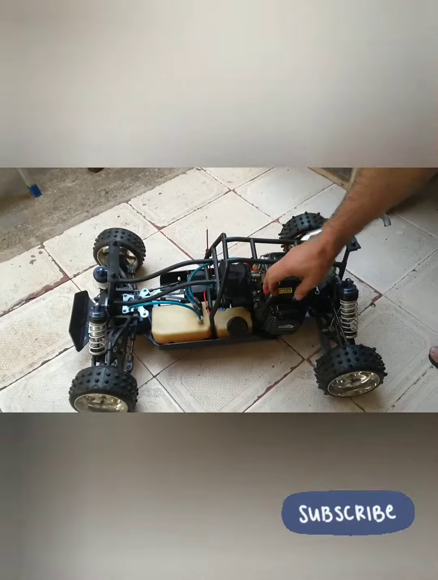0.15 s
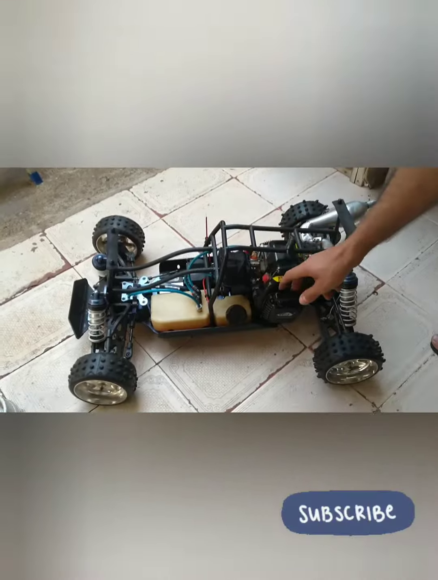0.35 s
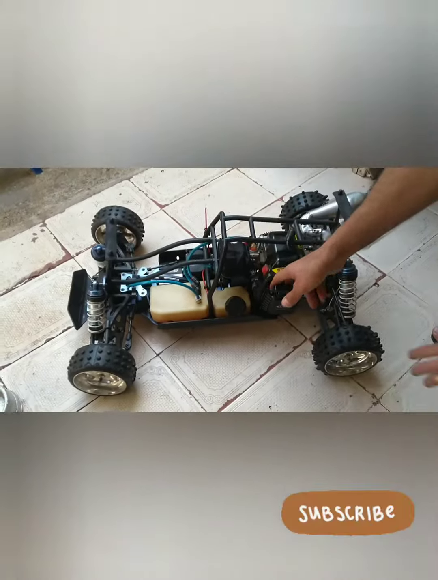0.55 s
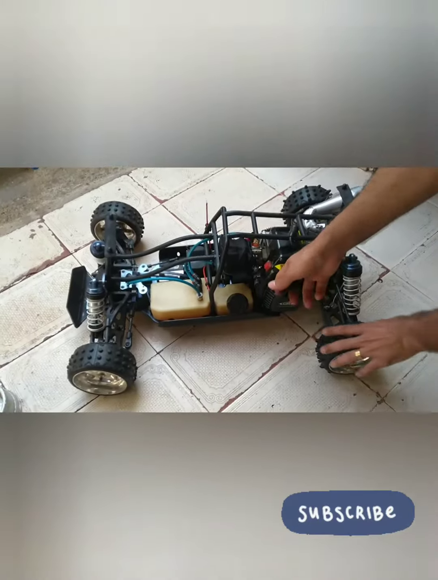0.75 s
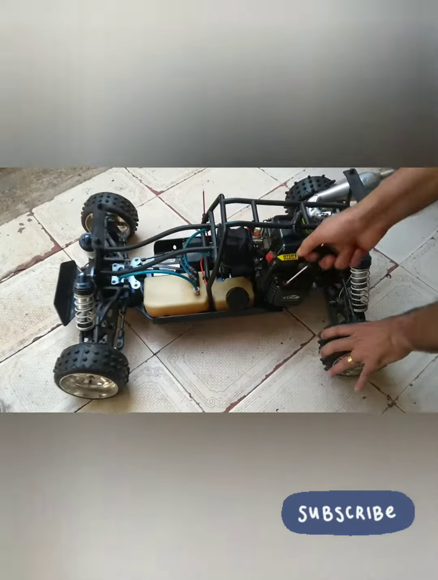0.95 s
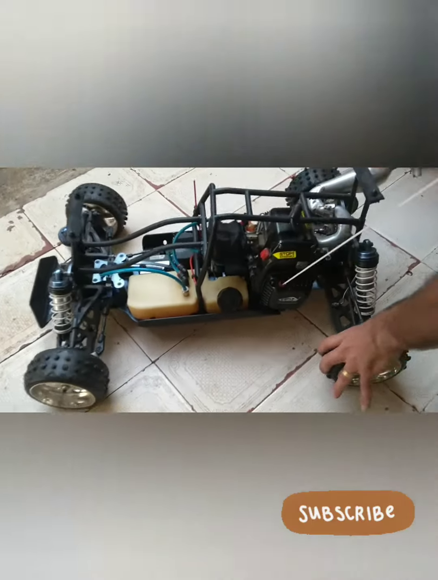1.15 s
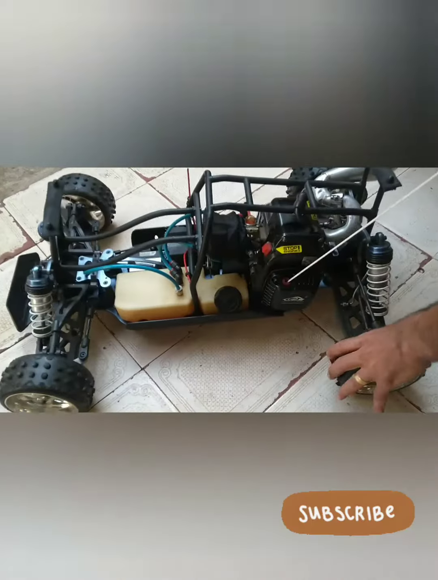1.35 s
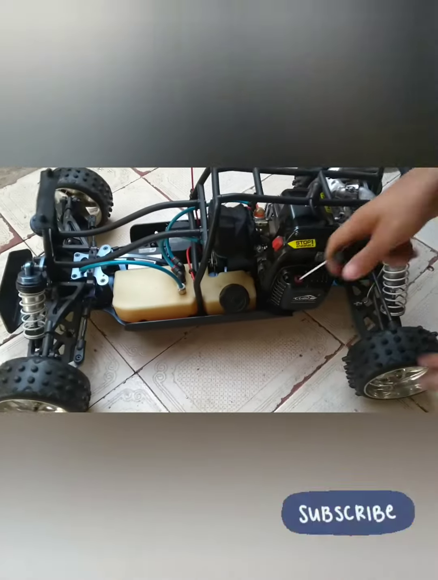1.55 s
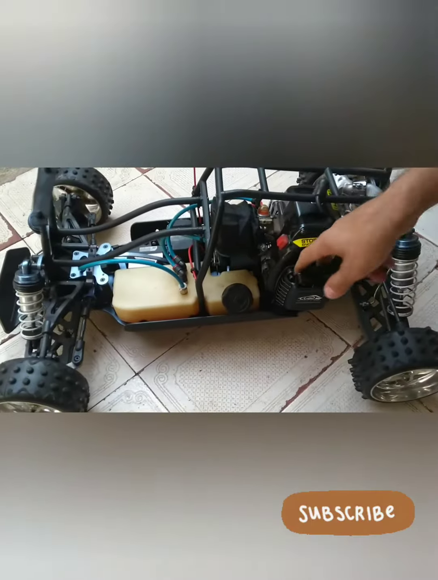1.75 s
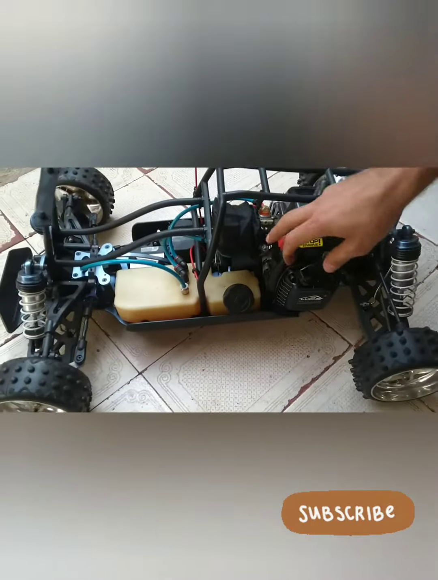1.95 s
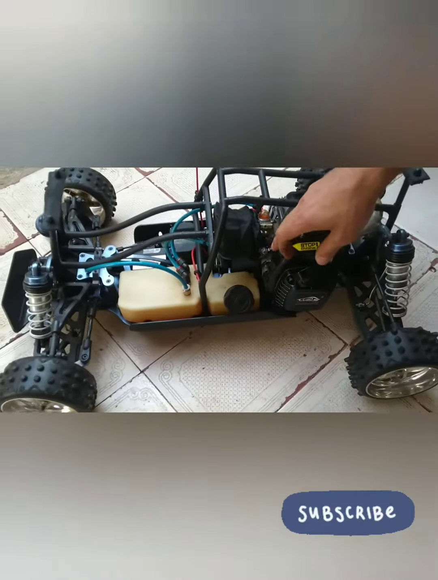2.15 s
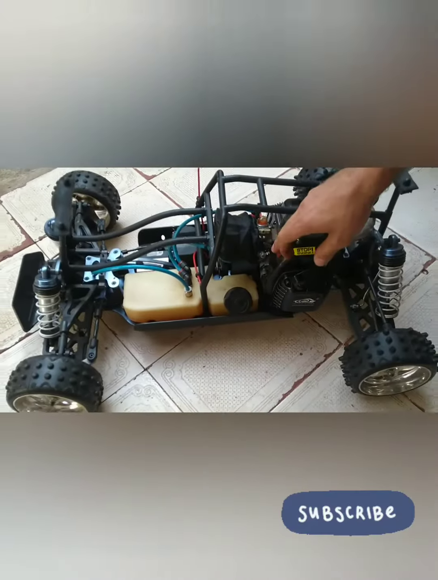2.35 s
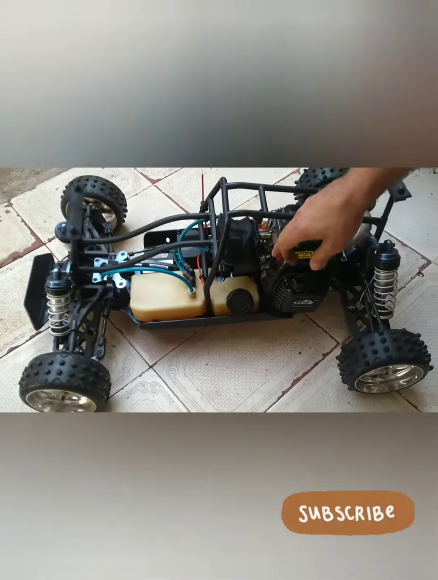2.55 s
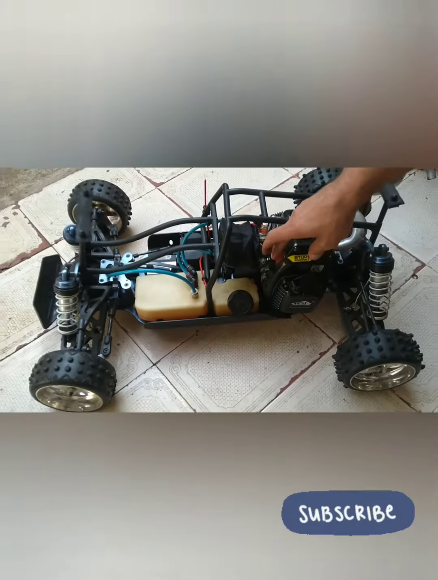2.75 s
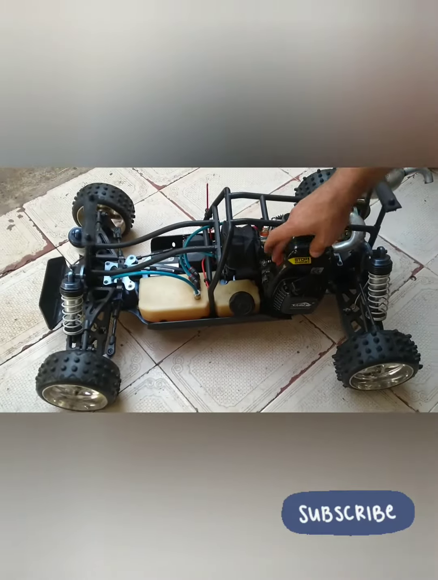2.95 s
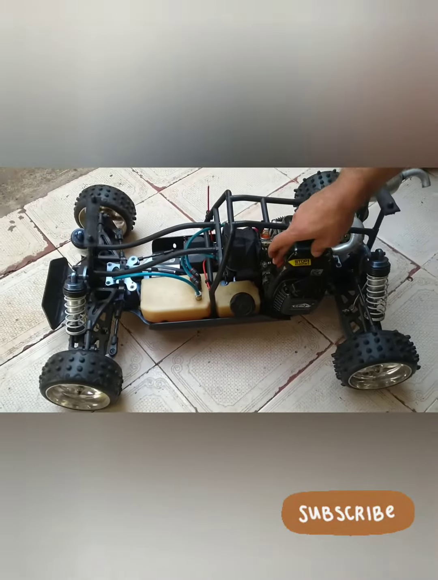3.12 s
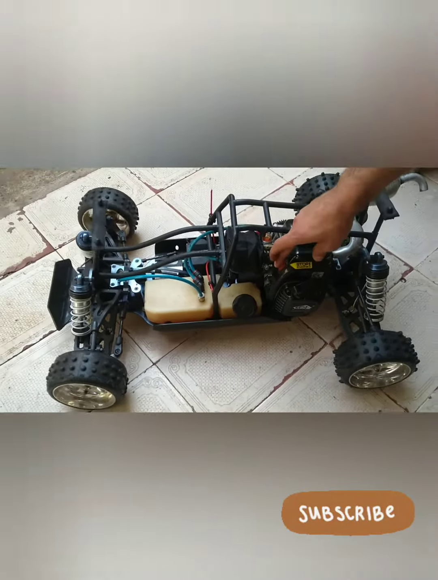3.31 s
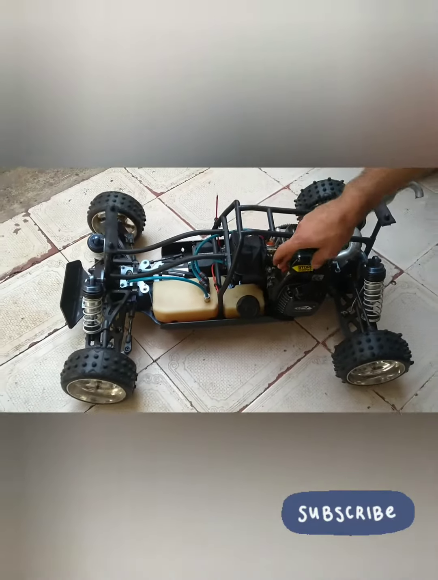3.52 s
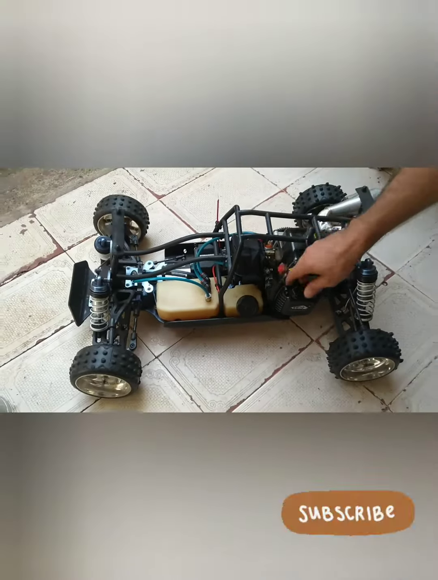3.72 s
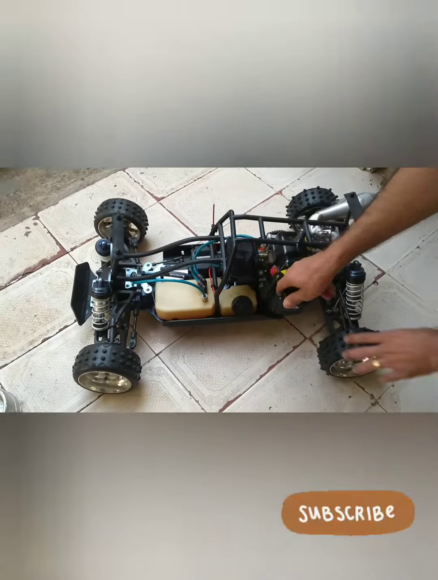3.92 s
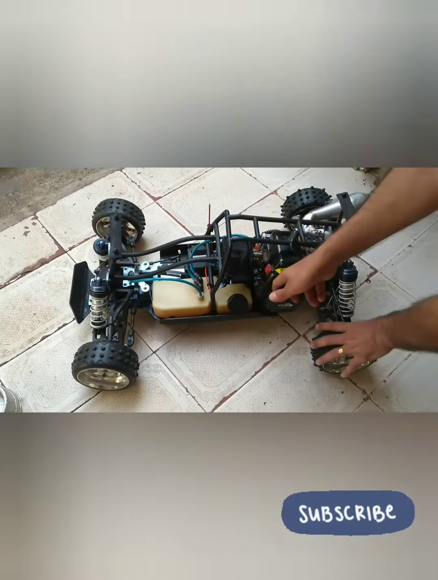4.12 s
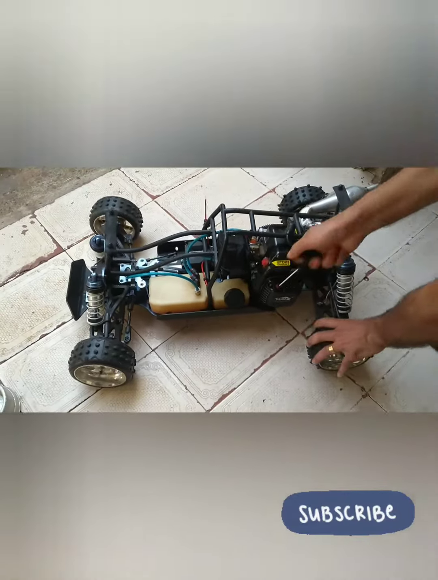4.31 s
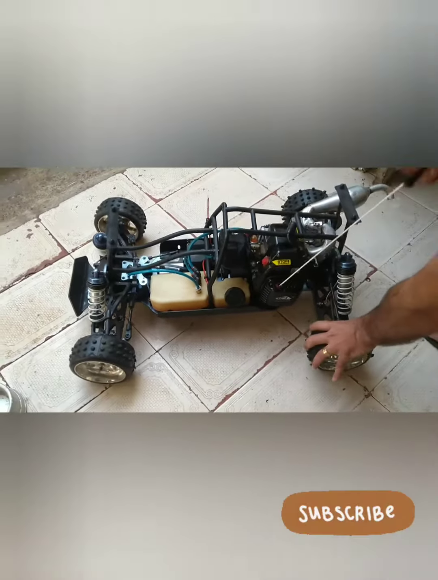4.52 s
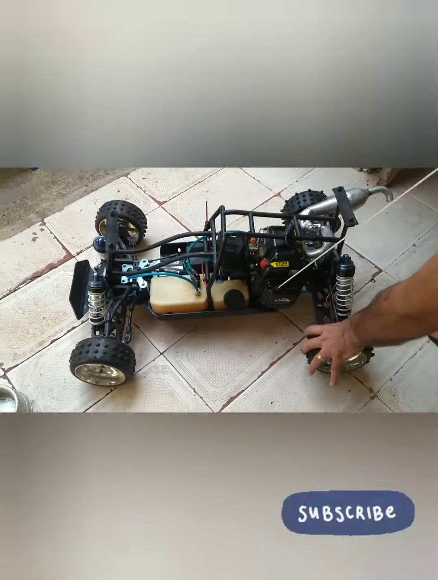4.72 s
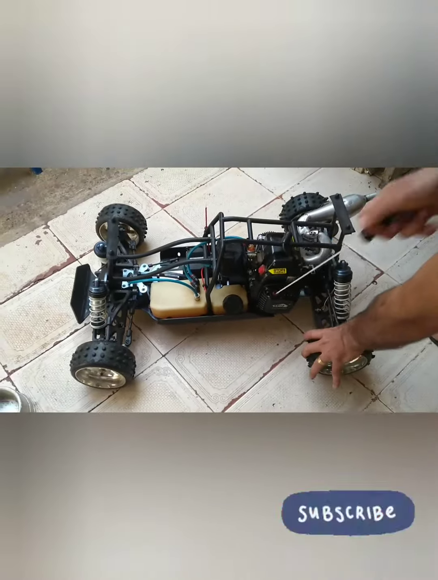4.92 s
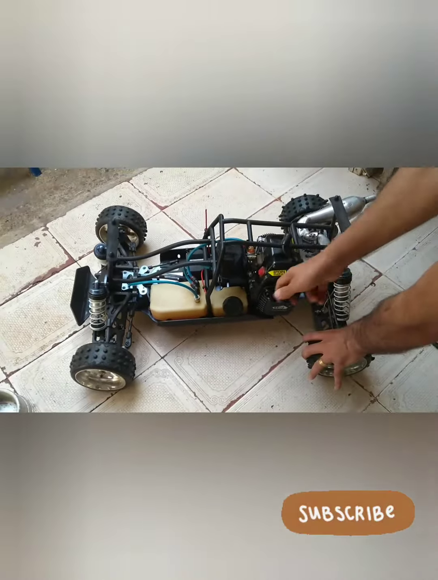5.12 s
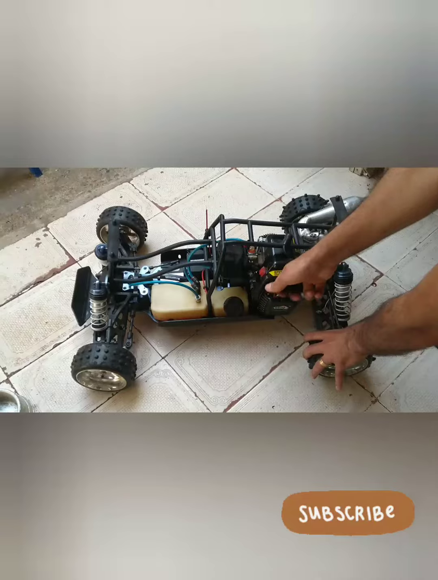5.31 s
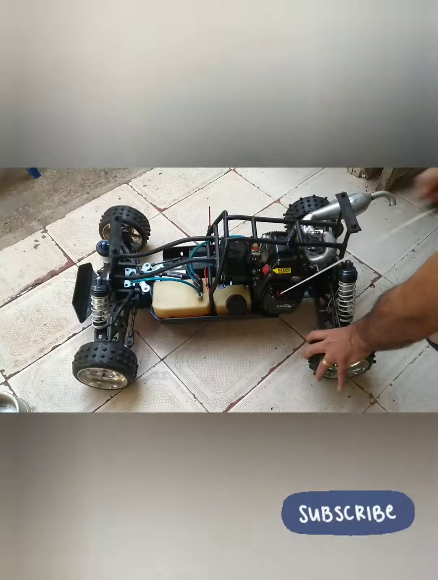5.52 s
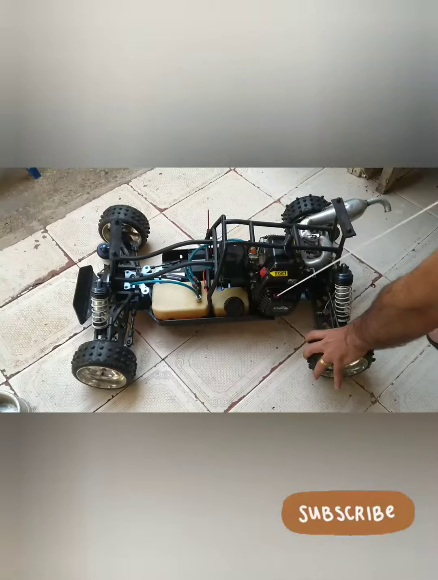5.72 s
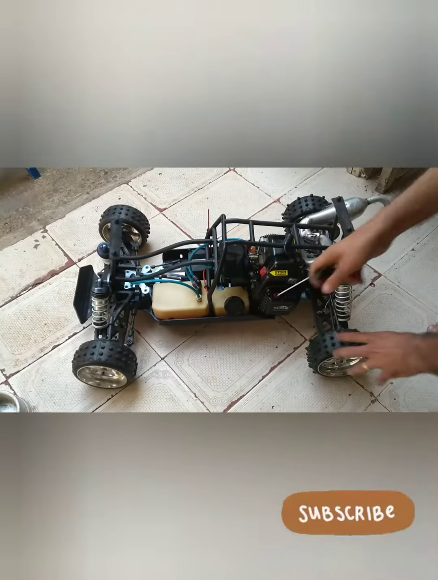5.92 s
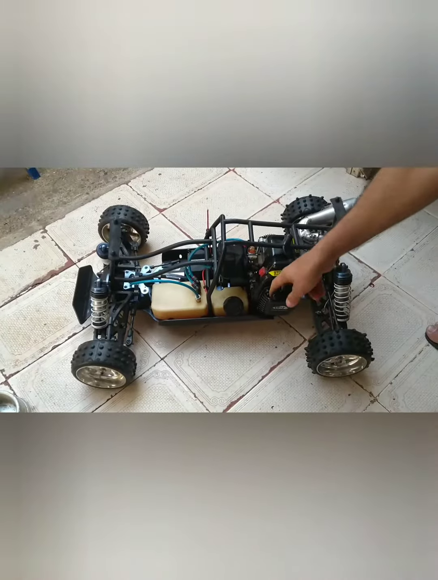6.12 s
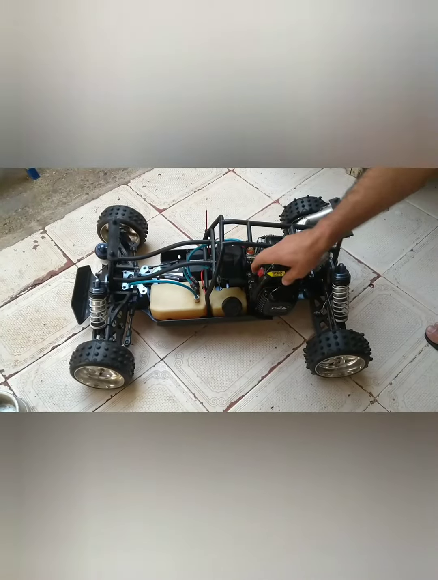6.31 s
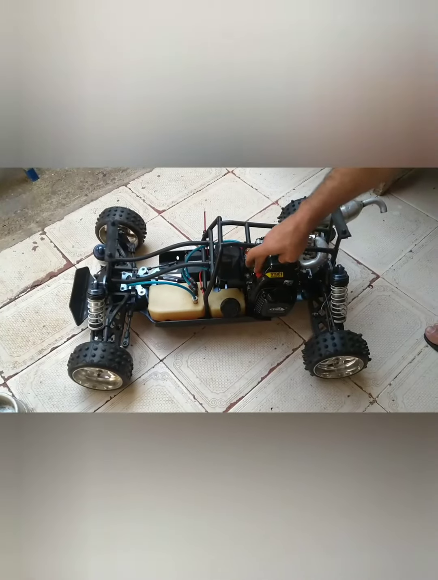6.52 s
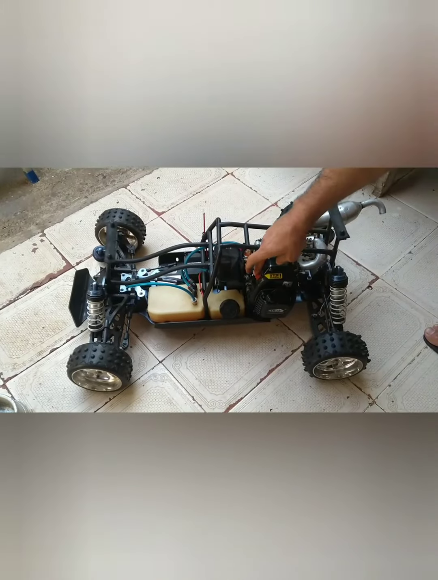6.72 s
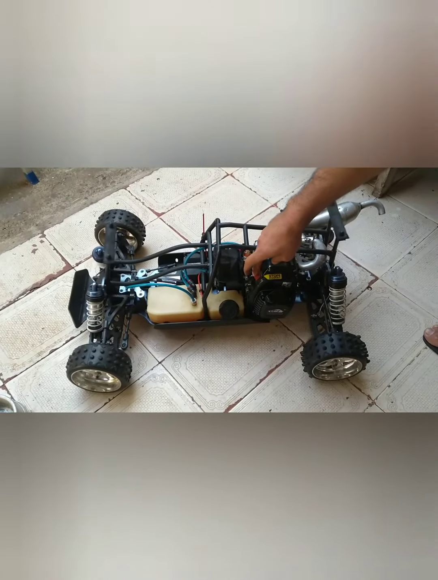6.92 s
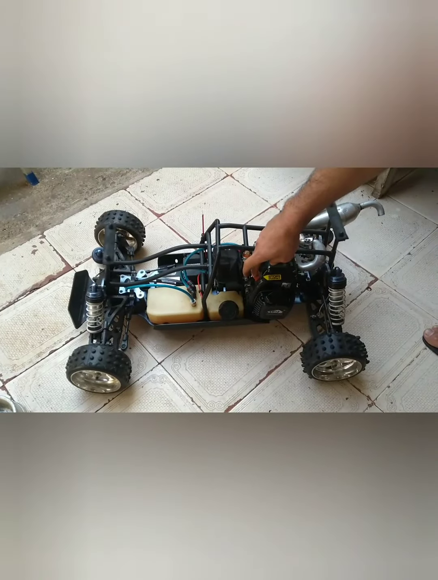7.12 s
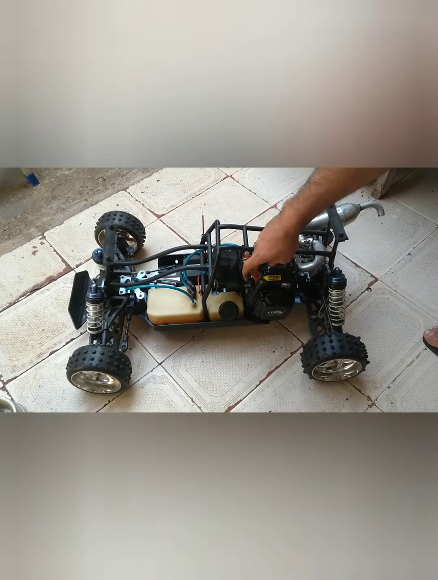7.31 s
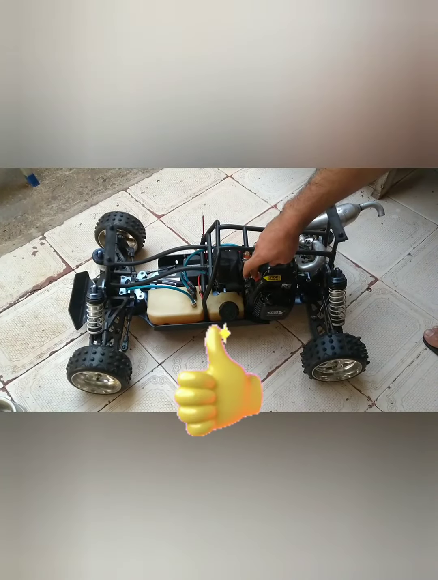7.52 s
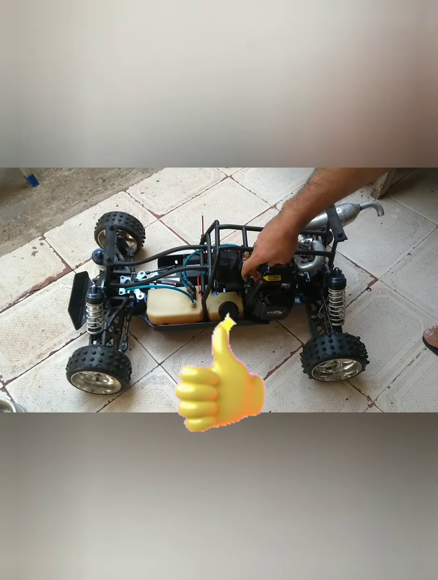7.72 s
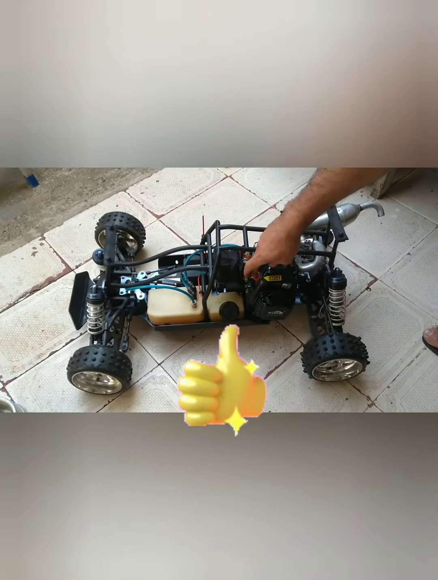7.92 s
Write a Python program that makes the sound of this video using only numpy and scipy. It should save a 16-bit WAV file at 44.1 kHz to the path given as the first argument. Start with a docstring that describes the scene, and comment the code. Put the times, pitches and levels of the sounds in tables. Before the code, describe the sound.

Close stereo pickup in a tiled yard with short hard echoes. Faint handling and small clicks, then a cord pull with low thumps sets off a small two-stroke engine, rasping and popping irregularly for about two seconds before it dies with a clack. A near-silent pause follows, then knocks, a scraping cord, thin reel squeaks, and a second pull starts the engine, which sputters on to the end.

```python
"""A small two-stroke engine in a tiled yard is pulled by its cord, sputters and dies.
After a pause with faint handling, the cord is pulled again with clicks and squeaks, and the engine runs.
Firings are blasts of noise through a resonant pipe; turns, thumps and knocks excite modes of the body and frame.
Echoes, low hum and faint air surround it; two ports, each less the delayed other, give left and right.
"""
import sys
import numpy as np
from scipy import signal
from scipy.fft import rfft, irfft, next_fast_len
from scipy.io import wavfile

SR = 44100
rng = np.random.default_rng(int(sys.argv[2]) if len(sys.argv) > 2 else 0)


def put_to_file(sound):
    """Save the sound as 16-bit audio at rate SR, in the file named by the first command-line argument."""
    columns = np.atleast_2d(sound).T  # one column per channel
    safe = np.clip(columns, -1, 1)
    whole_steps = np.round(safe * 32767)
    wavfile.write(sys.argv[1], SR, whole_steps.astype(np.int16))


N = 350593
T = np.arange(N) / SR
SIZE = next_fast_len(N + SR)
HZ = np.maximum(np.fft.rfftfreq(SIZE, 1 / SR), 1)


def amp(db):
    """Level law: decibels to amplitude ratio."""
    return 10 ** (np.asarray(db) / 20)


def unit(x):
    """Normalisation: scaled to rms 1."""
    return x / np.sqrt(np.mean(x ** 2) + 1e-20)


def at_hz(points):
    """Logarithmic pitch scale: a spectrum table interpolated at every frequency."""
    return np.interp(np.log(HZ), np.log(np.array(points)[:, 0]), np.array(points)[:, 1])


def shaped(x, response):
    """Linear filtering: the spectrum is multiplied by a frequency response."""
    return irfft(rfft(x, SIZE) * response, SIZE)[..., :N]


def high_pass(corner_hz, order):
    """Bass loss: cascaded first-order high-pass response."""
    return 1 / (1 + corner_hz / (1j * HZ)) ** order


# correlation of the two ports: pitch_hz, likeness (0 to 1)
PORT_LIKENESS = [(30, .9995), (120, .995), (300, .99), (600, .95), (1000, .3), (1500, 0.), (14000, 0.)]


def at_ports(colour):
    """Spatial coherence: coloured noise, alike at both ports in the bass, unrelated in the treble; rms 1."""
    alike = at_hz(PORT_LIKENESS)
    mid, side = rng.standard_normal((2, len(HZ))) + 1j * rng.standard_normal((2, len(HZ)))
    opposed = side * np.sqrt(1 - alike) * [[1], [-1]]
    return unit(irfft(colour * (mid * np.sqrt(1 + alike) + opposed), SIZE)[:, :N])


def narrow(hz, width_hz):
    """Resonance: noise in one narrow band, at half amplitude width_hz from its centre."""
    return at_ports(1 / (1 + ((HZ - hz) / width_hz) ** 2))


def dying(times, gains, t60s, attack_s, shut_db=0, shut_s=1):
    """Exponential decay: events rise fast and die away, with a further drop around shut_s."""
    out = np.zeros(N)
    for s, gain, t60 in zip(times, gains, t60s):
        i = int(s * SR)
        t = T[:min(N - i, SR // 2)]
        drop_db = shut_db / (1 + (shut_s / (t + 1 / SR)) ** 6)
        out[i:i + len(t)] += gain * (1 - np.exp(-t / attack_s)) * amp(-60 * t / max(t60, .005) + drop_db)
    return out


def in_time(tables):
    """Envelope: level columns interpolated in time as gains, silent outside the tables."""
    out = 0
    for rows in tables:
        s, *levels = np.transpose(rows)
        out = out + amp([np.interp(T, s, level, left=-150, right=-150) for level in levels])
    return out


def spells(rows, edge_db_per_s):
    """Envelope: each sound sets in, holds and fades at the given rate, setting in 3.7 times faster."""
    out = 0
    for s, length, db in rows:
        outside_s = np.maximum(np.maximum(3.7 * (s - T), T - s - length), 0)
        out = out + amp(db - edge_db_per_s * outside_s)
    return out


def crackle(per_s, lasting_s, depth):
    """Shot noise: random bursts that decay exponentially make an uneven gain of rms 1."""
    bursts = (rng.random(N) < per_s / SR) * np.minimum(rng.exponential(1, N), 2)
    decay = np.exp(-1 / (lasting_s * SR))
    # the tiny offset avoids denormal numbers
    return unit(1 + depth * unit(signal.lfilter([1], [1, -decay], bursts + 1e-18)))


def modal(modes):
    """Modal superposition: a sum of damped resonances, with alternating signs and a cut in the deep bass."""
    response = 0
    for k, (hz, db, t60) in enumerate(modes):
        damping = np.log(1000) / t60
        response = response + (-1) ** k * amp(db) / (damping + 1j * np.pi * (HZ ** 2 - hz ** 2) / HZ)
    return response * high_pass(100, 2)


def scattered(events, modes, spread_db):
    """Random excitation: a random strength per blow and mode, a random phase at each port."""
    draws = rng.standard_normal((len(events), 3, len(modes)))
    return amp(spread_db * draws[:, :1]) * np.exp(1j * draws[:, 1:])


def struck(modes, times, gains, damped_s=None, attack_s=1e-4):
    """Free vibration: blows ring the modes; gains has strength and phase per blow, port and mode."""
    hz, level_db, t60 = np.transpose(modes)[:, :, None]
    t = T[:SR // 3]
    rings = amp(level_db - 60 * t / t60) * np.exp(2j * np.pi * hz * t) * (1 - np.exp(-t / attack_s))
    out = np.zeros((2, N + len(t)))
    for k, (s, gain) in enumerate(zip(times, gains)):
        damping = 1 if damped_s is None else amp(-60 * t / damped_s[k])
        start = int(s * SR)
        out[:, start:start + len(t)] += np.imag(gain @ rings) * damping
    return out[:, :N]


# spectrum of the background air noise: pitch_hz, level_db (relative)
AIR_SPECTRUM = [(25, -22), (50, -1), (100, 6), (300, -3), (1000, -4), (2000, -7.5), (2240, -13.5),
                (2500, -7), (5000, -8.5), (10000, -9.5), (14500, -14)]


def air():
    """Stationary random noise: a faint coloured bed under everything."""
    return amp(-63.5) * at_ports(amp(at_hz(AIR_SPECTRUM)))


def yard(x):
    """Reverberation: dense echoes from tiles and walls decay exponentially, with bass and treble lost."""
    t60_s, level_db, treble_cut_hz, bass_cut_hz = 0.4, -3.5, 11000, 292
    t = T[:SR]
    echoes = at_ports(1)[:, :SR] * amp(-60 * t / t60_s) * (t > .006)
    echoes = echoes / np.sqrt(np.sum(echoes ** 2) / 2)
    colour = high_pass(bass_cut_hz, 1) / (1 + 1j * HZ / treble_cut_hz)
    return amp(level_db) * shaped(x.mean(axis=0), rfft(echoes, SIZE) * colour)


# low background rumble and hum, and held notes of pipe or body:
# start_s, length_s, level_db, pitch_hz, fade_db_per_s
HUM_AND_NOTE_SPELLS = [(0, 0.23, -67, 52, 100), (.4, 0.31, -66, 52, 100), (3.375, 0.13, -72.5, 52, 100),
                       (0.0, 0.052, -63.5, 161, 45), (1.2, 0.14, -41, 421, 200),
                       (1.512, 0.63, -49.5, 401.1, 197), (2.2, 0.85, -45, 421, 206),
                       (2.898, 0.16, -37, 228, 93), (2.958, 0.24, -44.5, 161.4, 77),
                       (3.028, 0.055, -45, 386, 103), (5.565, 0.36, -44, 432, 200),
                       (7.802, 0.18, -48, 420.6, 200)]


def hum_and_notes():
    """Resonance: narrow bands of noise, as background rumble and hum or notes of pipe or body, hold and fade."""
    out = 0
    for s, length, db, hz, fade in HUM_AND_NOTE_SPELLS:
        out = out + spells([(s, length, db)], fade) * narrow(hz, 13)
    return out


# hands and cord on the machine, one table before each run: time_s, rub_db, rustle_db (both relative)
HAND_LEVELS = [
    [(0.0, -54, -50), (0.07, -58, -78), (0.14, -63, -66.5), (0.5, -66.5, -63.5), (0.8, -59.5, -54),
     (0.98, -65, -48), (1.04, -43, -39)],
    [(4.1, -71, -67.5), (4.36, -73, -50), (4.42, -20, -25.5), (4.46, -34.5, -29.5), (4.49, -38, -33.5),
     (4.55, -42.5, -24), (4.6, -30.5, -38), (4.72, -45, -54.5), (4.77, -30, -37.5), (4.85, -40, -39.5),
     (5.0, -52, -53.5), (5.14, -58, -37), (5.28, -61, -49), (5.38, -62, -38.5), (5.49, -32, -30)],
]
# spectrum under the fingers: pitch_hz, level_db (relative)
RUSTLE_SPECTRUM = [(200, -10.5), (500, -2.5), (800, -0.5), (1300, -2), (2200, -2.5), (3200, -25.5)]
# spectrum of the cord in its guide: pitch_hz, level_db (relative)
SCRAPE_SPECTRUM = [(1500, -18.5), (2500, 0), (4000, -5.5), (5500, -10.5), (9000, -15), (13500, -5.5)]


def handling():
    """Friction noise: rubbing drives the body, the surface under the fingers and the cord guide."""
    rub, rustle = in_time(HAND_LEVELS) * amp(-4.5)
    uneven = crackle(100, .004, .4)
    fingers = at_ports(amp(at_hz(RUSTLE_SPECTRUM)))
    guide = amp(1.5) * at_ports(amp(at_hz(SCRAPE_SPECTRUM)))
    return rub * at_ports(modal(BODY_MODES)) + rustle * uneven * (fingers + guide)


# cord and fingers dragged over the starter: start_s, length_s, level_db
DRAG_SPELLS = [(.367, 0.008, -43.5), (4.93, 0.19, -33.5), (5.31, 0.02, -31.5)]
# squeaks of the cord reel winding back: start_s, level_db
REEL_SQUEAKS = [(4.938, -39), (4.96, -37), (4.996, -27), (5.04, -44), (5.068, -43), (5.308, -37)]


def reel():
    """Friction and resonance: the cord scrapes in uneven bursts, the reel gives short thin whistles."""
    s, db = np.transpose(REEL_SQUEAKS)
    whistle = dying(s, amp(db), 0 * s + 0.11, 0.003) * narrow(8600, 60)
    drag = spells(DRAG_SPELLS, 900) * crackle(90, 0.0049, 1.0)
    return drag * at_ports(amp(at_hz(SCRAPE_SPECTRUM))) + whistle


# hand, starter pawls and cord handle: start_s, level_db (relative), pitch_hz, rattle_t60_s
KNOCKS = [(0.147, -44, 1000, 0.081), (0.365, -43, 550, 0.027), (0.372, -37, 1700, .05),
          (0.378, -46, 2860, .04), (0.426, -43, 850, 0.073), (0.513, -41, 1220, 0.072),
          (0.647, -42.5, 650, 0.1), (0.82, -42.5, 760, 0.12), (0.876, -41, 2900, 0.06),
          (0.998, -41, 1040, 0.08), (1.028, -28, 1160, 0.08), (1.038, -15.5, 1156, 0.22),
          (3.03, -24, 1030, 0.049), (3.17, -24.5, 1080, 0.24), (3.279, -46, 697, 0.26),
          (3.314, -32.5, 3860, 0.18), (3.389, -43, 665, 0.062), (4.164, -39, 790, 0.031),
          (4.239, -49, 1220, 0.077), (4.362, -26.5, 1380, 0.022), (4.387, -25, 1340, 0.21),
          (4.4, -18.5, 1350, 0.19), (4.496, -22.5, 1220, 0.15), (4.553, -13, 840, 0.053),
          (4.745, -23, 1600, 0.04), (4.75, -32.5, 1470, 0.82), (4.764, -33, 790, 0.24),
          (4.893, -25.5, 840, 0.33), (4.936, -26, 3920, 0.072), (4.958, -18, 3970, 0.1),
          (4.974, -17.5, 3950, 0.061), (4.992, -19, 3950, 0.048), (5.001, -20.5, 3970, 0.3),
          (5.055, -30, 3900, .05), (5.075, -39, 3900, .05), (5.094, -31, 3900, 0.043),
          (5.123, -18, 1240, 0.015), (5.1269, -10.5, 1150, 0.015), (5.130, -20, 770, .02),
          (5.140, -21, 1300, 0.014), (5.195, -35, 3400, 0.076), (5.2, -29, 780, 0.072),
          (5.212, -25, 780, 0.04), (5.224, -18.5, 774, 0.016), (5.305, -22, 3400, 0.069),
          (5.308, -26.5, 3600, .04), (5.308, -31, 1150, .02), (5.352, -21, 780, 0.036),
          (5.382, -34, 815, 0.037), (5.404, -17.5, 1100, 0.0089), (5.477, -13.5, 1450, 0.04)]
# plastic and metal of the starter and frame: pitch_hz, level_db (relative), t60_s
FRAME_MODES = [(530, -4.5, 0.05), (700, -3, 0.051), (774, 3, 0.064), (890, -8, 0.035), (1051, -7, 0.12),
               (1229, 1.5, 0.042), (1356, -3, 0.033), (1464, -3, 0.03), (1713, 0, 0.084), (1792, -2, 0.073),
               (2900, 3, 0.077), (3407, 4, .025), (3890, 9, 0.019), (3900, -2.5, 0.089), (4710, 13, 0.064)]


def clicks():
    """Impact excitation: each knock favours frame modes near its pitch, under a short broad rattle."""
    s, level_db, hz, t60 = np.transpose(KNOCKS)
    octaves = np.abs(np.log2(np.array(FRAME_MODES)[:, 0] / hz[:, None]))
    strength = amp(level_db[:, None] - 11.5 - 17.0 * octaves)[:, None]
    gains = strength * scattered(s, FRAME_MODES, spread_db=5.0)
    rings = struck(FRAME_MODES, s, gains, attack_s=0.00029)
    rings = shaped(rings, high_pass(300, 2))   # small parts send no bass
    rattle = dying(s, amp(level_db - 7.0), t60, 0.0057) * at_ports(high_pass(500, 2))
    return rings + rattle


# low thumps as the cord is pulled, with one short click:
# start_s, level_db (relative), deepest_mode_db (relative), favoured_pitch_hz, damping_t60_s
PULL_THUMPS = [(0.854, -46.5, -47.5, 180, 0.6), (1.047, -6.5, -23, 177, 0.42), (1.071, -13, -27, 220, 0.29),
               (1.097, -4, -28.5, 228, 0.46), (1.114, -15, -30.5, 220, 0.24), (4.397, -9, -24.5, 174, 0.7),
               (4.419, -15, -30, 185, 0.26), (4.457, -11.5, -34.5, 226, 0.27),
               (4.508, -9.5, -21, 175, 0.41), (4.53, -14.5, -35, 200, 0.17), (4.557, -2.5, -45, 258, 0.12),
               (4.611, -13.5, -33, 256, 1.0), (4.634, -22, -41.5, 258, 0.47),
               (4.763, -23, -26.5, 219, 0.22), (4.79, -20, -28, 255, 0.18), (4.819, -17, -32, 148, .3),
               (4.841, -35, -23.5, 170, 0.22), (4.862, -24.5, -27, 260, 0.055),
               (5.255, -27, -31.5, 390, 0.027), (5.402, -39, -27, 150, 1), (5.486, -2.5, -30.5, 206, 0.4),
               (5.674, -14.5, -27, 238, 0.23)]


def pull_thumps():
    """Impact excitation: low thumps and one short click ring the body, each with a puff and a scrape."""
    softened_hz = 350   # the blow is softened above this
    s, level_db, deep_db, pitch_hz, damped_s = np.transpose(PULL_THUMPS)
    octaves = np.abs(np.log2(np.array(BODY_MODES)[1:, 0] / pitch_hz[:, None]))
    upper_db = level_db[:, None] - 5.5 - 30 * octaves   # modes far from the favoured pitch ring less
    levels_db = np.hstack([deep_db[:, None] + 15.5, upper_db])
    push = struck(BODY_MODES, s + .002, amp(levels_db)[:, None], damped_s)
    push = shaped(push, high_pass(95, 4))   # a small body sends no deep bass
    push = shaped(push, 1 / (1 + 1j * HZ / softened_hz) ** 2)
    puff = amp(-8) * at_ports(modal(BODY_MODES))
    scrape = amp(-27.5) * at_ports(amp(at_hz(SCRAPE_SPECTRUM)))
    return push + dying(s, amp(level_db), 0 * s + 0.067, 0.013) * (puff + scrape)


# nominal crank speed, adjusted to the firings: time_s, speed_turns_per_s
CRANK_SPEED = [(0, 37), (1.0, 50), (1.2, 56), (2.95, 62), (3.4, 42), (4.4, 40), (5.5, 45), (5.8, 59.7),
               (7.95, 50)]


def crank():
    """Periodicity: turns made so far, with a whole number of turns between two firings."""
    free = np.cumsum(np.interp(T, *np.transpose(CRANK_SPEED))) / SR
    at = np.interp([0] + [row[0] for row in FIRING_EVENTS] + [T[-1]], T, free)
    whole_turns = np.maximum(np.round(np.diff(at, prepend=0)), 1)
    return np.interp(free, at, np.cumsum(whole_turns))


# engine turning under its own power, one table a run:
# time_s, thump_db, rattle_db, exhaust_hiss_db (all relative)
TURNING_LEVELS = [
    [(1.05, -48, -22, -20.5), (1.19, -22, -25, -21.5), (1.23, -32.5, -46.5, -39.5),
     (1.45, -30, -26.5, -25.5), (1.9, -30, -28, -29), (2.1, -26.5, -26.5, -40), (2.55, -29, -28.5, -30.5),
     (3.06, -27, -28.5, -46), (3.12, -28, -42.5, -32.5), (3.22, -38.5, -52, -42.5), (3.39, -60, -65, -75),
     (3.65, -71, -75, -86)],
    [(5.49, -34.5, -24.5, -21.5), (5.58, -23, -26.5, -20.5), (5.92, -28.5, -27, -32),
     (6.42, -26, -23.5, -31), (6.57, -26, -25.5, -28), (6.74, -32.5, -36.5, -41.5), (6.95, -28.5, -28, -29),
     (7.3, -29, -27, -35.5), (7.67, -28, -28, -29.5), (7.95, -25.5, -30.5, -41.5)],
]
# crankcase, pipe and chassis: pitch_hz, level_db (relative), t60_s
BODY_MODES = [(129.2, -7, 0.28), (177.4, 0.5, 0.16), (216.2, 4, 0.073), (257.5, -4, 0.16),
              (280.7, -7.5, 0.17), (336.5, -8.5, 0.071), (391.4, -10, 0.16), (431.7, -18.5, 0.19)]
# spectrum of the rattle: pitch_hz, level_db (relative)
RATTLE_SPECTRUM = [(100, -46), (300, 0.5), (500, -6), (1000, 1.5), (2000, 3), (3000, 1), (6000, -53)]
# middle body modes: relative levels in the two runs, and a time between the runs
MIDDLE_FIRST_DB, MIDDLE_SECOND_DB, BETWEEN_RUNS_S = -8.5, 3.5, 4


def turning(turns, thump, rattle, rough=0.43):
    """Forced vibration: an uneven push per turn, with gas noise, drives the body; gears rattle in step."""
    whole = np.floor(turns).astype(int)
    # the port does not blow at one exact angle
    late = np.floor(turns - .15 * rng.random(N)[whole]).astype(int)
    pushes = (np.diff(late, prepend=0) > 0) * amp(2.5 * rng.standard_normal(N))
    drive = unit(pushes) + rough * at_ports(1)
    middle = modal(BODY_MODES[:6]) - modal(BODY_MODES[:3])
    middle_gain = amp(np.where(T < BETWEEN_RUNS_S, MIDDLE_FIRST_DB, MIDDLE_SECOND_DB))
    thumps = shaped(drive, modal(BODY_MODES) - middle) + middle_gain * shaped(drive, middle)
    # the level swings once a turn, loudest at this share of it
    thumps = thumps * (1 + .55 * np.cos(2 * np.pi * (turns - 0.35)))
    thumps = shaped(thumps, high_pass(90, 2))   # a small body sends no deep bass
    shake = amp(-35.5) * at_ports(1 / (1 + (HZ / 80) ** 4))   # deep shaking of the ground
    beat = 1 + .7 * amp(5 * rng.standard_normal(N))[whole] * np.exp(-4 * (turns - whole))
    # loose parts knock at random
    grains = (rng.random(N) < 1500 / SR) * amp(4.0 * np.minimum(rng.exponential(1, N), 4))
    knocks = shaped(at_ports(1) * beat * (1.62 + unit(grains)), amp(at_hz(RATTLE_SPECTRUM)))
    return amp(-5.5) * thump * (unit(thumps) + shake) + amp(-4.0) * rattle * unit(knocks)


# walls of the exhaust pipe: pitch_hz, level_db (relative), t60_s
WALL_MODES = [(1780, -4, .14), (1845, -2, .14), (1878, 0, .18), (1975, -5, .12), (2370, -3, .14),
              (3270, -5, .1), (3530, -4, .1), (3775, -4, .1), (3880, -1, .12), (3935, -3, .12),
              (3995, -1, .12), (4265, -4, .1), (4335, -3, .1), (6150, -3, .05), (6230, 0, .07)]


def walls():
    """Impact excitation: each firing rings the modes of the pipe's walls."""
    s, level_db, treble_db, decay_s = np.transpose(FIRING_EVENTS)
    ring_db = -17.5 + 0.73 * (level_db + treble_db)   # follows only a share of the treble level
    chance = scattered(s, WALL_MODES, spread_db=6)
    return struck(WALL_MODES, s + 0.00098, amp(ring_db)[:, None, None] * chance)


# metal of pipe and cylinder fins: pitch_hz, width_hz, level_db (relative)
METAL_RESONANCES = [(1040, 100, -2), (1400, 150, -4), (1880, 110, 6), (3400, 250, 1), (3950, 150, 9),
                    (4300, 100, 3), (6230, 220, 2)]


def pipe():
    """Standing waves: a tube returns part of each wave, less in the treble, and its metal resonates."""
    overtone_spacing_hz, bass_return = 468.5, 0.31
    metal = 1
    for hz, width_hz, db in METAL_RESONANCES:
        metal = metal + amp(db) / (1 + 1j * (HZ ** 2 - hz ** 2) / (HZ * width_hz))
    returned = bass_return / (1 + HZ / 12000)
    return metal / (1 - returned * np.exp(-2j * np.pi * HZ / overtone_spacing_hz))


# firings: start_s, level_db (relative), treble_db (relative to that level), decay_s (scaled in exhaust)
FIRING_EVENTS = [(1.1243, -5, -22.5, 0.08), (1.1732, -12, -17.5, 0.072), (1.1928, -12.5, -12, 0.22),
                 (1.2542, -12, -10, 0.13), (1.314, -15, -3, 0.16), (1.3902, -17.5, -4, 0.16),
                 (1.4467, -18, -19, 0.16), (1.5317, -16.5, -21.5, 0.29), (1.6473, -13.5, -4, 0.29),
                 (1.716, -23, -14, .2), (1.7327, -14, -21.5, 0.075), (1.799, -13.5, -4, 0.24),
                 (1.8655, -16, -15.5, 0.11), (1.934, -29.5, -23, .2), (2.0009, -21.5, -12.5, 0.55),
                 (2.0537, -10.5, -7, 0.21), (2.123, -17.5, -2.5, 0.26), (2.1743, -9, -7.5, 0.12),
                 (2.2248, -12.5, -4.5, 0.21), (2.2787, -12.5, -13.5, 0.18), (2.3265, -12.5, -25.5, 0.17),
                 (2.3945, -7.5, -6.5, 0.18), (2.4602, -12.5, -2, 0.15), (2.5278, -13, -6, 0.19),
                 (2.58, -13, -3.5, 0.11), (2.6624, -14.5, -11.5, 0.21), (2.7454, -18, -27, 0.42),
                 (2.8126, -13, -2.5, 0.31), (2.8636, -10, -12.5, .16), (2.9124, -13, -13.5, 0.13),
                 (3.127, -43, -18, .15), (3.185, -31, -18, 0.16), (5.5156, -5.5, -19, 0.051),
                 (5.5933, -14.5, -19.5, 0.25), (5.6629, -9, -16, 0.124), (5.7535, -7, -16, 0.07),
                 (5.8206, -15, -11, 0.26), (5.8408, -24.5, -6, .15), (5.9011, -21, -2, 0.31),
                 (5.9585, -16, -20, 0.53), (6.0704, -16, -14, 0.51), (6.1454, -10, -9, 0.26),
                 (6.1986, -21, -6, 0.073), (6.3184, -12, -11, 0.29), (6.3734, -18, -32.5, 0.52),
                 (6.493, -10, -19.5, 0.18), (6.5434, -10.5, -7, 0.24), (6.609, -26, 4.5, 0.27),
                 (6.6813, -17.5, -3.5, 0.33), (6.7479, -13, -9, 0.33), (6.799, -15, -30, 0.24),
                 (6.8868, -16, -22.5, 0.15), (6.9532, -15, -8, 0.22), (7.022, -14.5, -20.5, 0.14),
                 (7.1049, -11, -5, 0.19), (7.1732, -15.5, -5, 0.37), (7.2242, -14.5, -19, 0.3),
                 (7.337, -29.5, -37, 0.17), (7.3945, -11.5, -8, 0.27), (7.4609, -12.5, -5, 0.17),
                 (7.5299, -22.5, -31.5, 0.28), (7.5949, -16.5, -39, 0.16), (7.6632, -13.5, -11.5, 0.17),
                 (7.7489, -28, -10.5, 0.15), (7.7668, -9, -12, 0.19)]
# spectrum of the blast: pitch_hz, level_db (relative)
BARK_SPECTRUM = [(100, -52), (300, -22), (600, -16), (1500, -11.5), (4400, -8.5), (5200, -2), (9000, 3.5),
                 (14500, 1.5)]


def exhaust(turns, hiss, throb=0.0074):
    """Pulsed flow noise: a crack and blast at each firing, over a hiss that swells very slightly each turn."""
    s, level_db, treble_db, decay_s = np.transpose(FIRING_EVENTS)
    split = 1 / (1 + (HZ / 5000) ** 8)
    bark = amp(at_hz(BARK_SPECTRUM))
    low, high = at_ports(split * bark), at_ports((1 - split) * bark)
    sputter = crackle(200, .002, .45)   # the gas leaves in uneven bursts
    port = sputter * (1 + throb * np.cos(2 * np.pi * (turns - .1)))

    def blast(db, attack_s):
        """Transient flow: a sharp crack, and a longer blow that drops further after some 32 ms."""
        blow = dying(s, amp(db - 14.5), 1.424 * decay_s, attack_s, shut_db=-5, shut_s=.032)
        crack = dying(s, amp(db - 11), 0 * s + .02, 0.00015)
        return port * blow + crack

    steady = port * hiss * amp(-10.5) * unit(low + 2.8 * high)
    front = np.zeros(N)   # the steep pressure front of each firing
    front[(s * SR).astype(int) + 40] = amp(level_db + 3)
    front = shaped(front, high_pass(400, 2) / (1 + 1j * HZ / 7000))
    low_blast = low * blast(level_db, 0.0061)
    high_blast = high * blast(level_db + treble_db + 12, .001)   # the treble sets in first
    return shaped(front + low_blast + high_blast + steady, pipe())


def scene():
    """Superposition: all sources, their echoes and the air as they reach the two ports."""
    thump, rattle, hiss = in_time(TURNING_LEVELS)
    turns = crank()
    engine = exhaust(turns, hiss) + walls() + turning(turns, thump, rattle)
    sources = engine + hum_and_notes() + pull_thumps() + clicks() + handling() + reel()
    return sources + yard(sources) + air()


# balance of the ports: pitch_hz, first_over_second_db
PORT_BALANCE = [(30, .5), (60, 1.8), (120, 2.3), (300, 1.5), (600, 1.0), (1000, 1.5), (5000, 1.0),
                (8000, -4.0), (14000, -5.0)]
# share of the other port taken away: pitch_hz, share
SUBTRACTED_SHARE = [(4500, 1.0), (7500, .4), (14000, .3)]


def record(dry):
    """Pressure gradient: each side is one port less the delayed other; bass is lifted and the top cut."""
    port_lag_s, bass_lift_hz, low_cut_hz, cutoff_hz = 1 / 2390, 648, 25, 14650
    tilt = amp(at_hz(PORT_BALANCE) / 2)
    ports = rfft(dry, SIZE) * [tilt, 1 / tilt]
    delay = np.exp(-2j * np.pi * HZ * port_lag_s)
    sides = ports - ports[::-1] * at_hz(SUBTRACTED_SHARE) * delay
    lift = (1 + bass_lift_hz / (1j * HZ)) * high_pass(low_cut_hz, 2)
    out = irfft(0.82 * sides * lift, SIZE)[:, :N]
    return signal.sosfilt(signal.cheby2(14, 45, cutoff_hz, fs=SR, output="sos"), out)


dry = scene()
out = record(dry)
put_to_file(out)
```